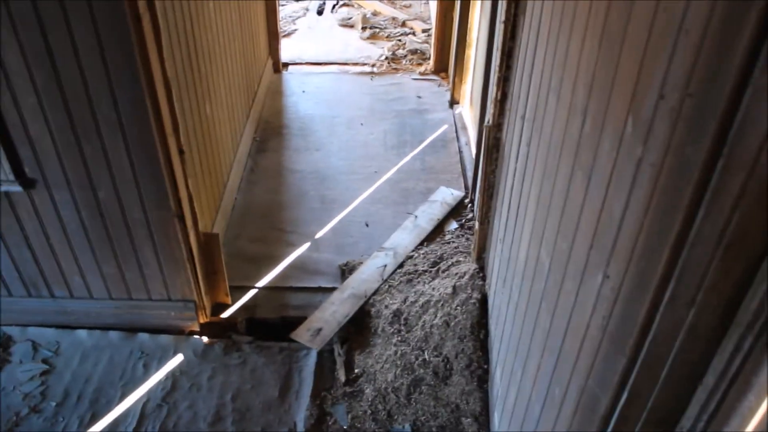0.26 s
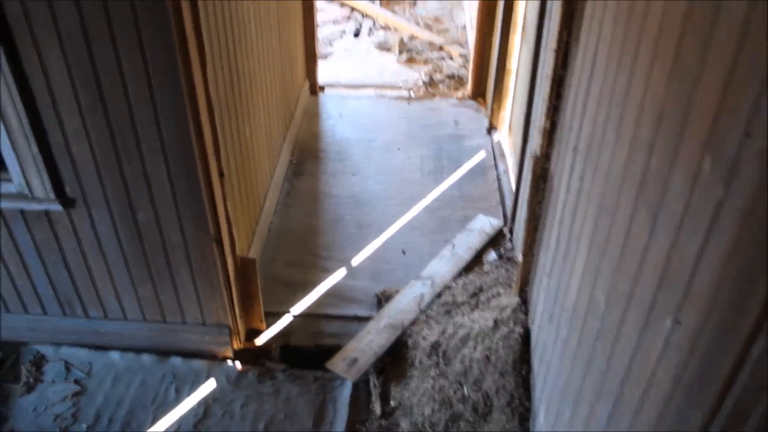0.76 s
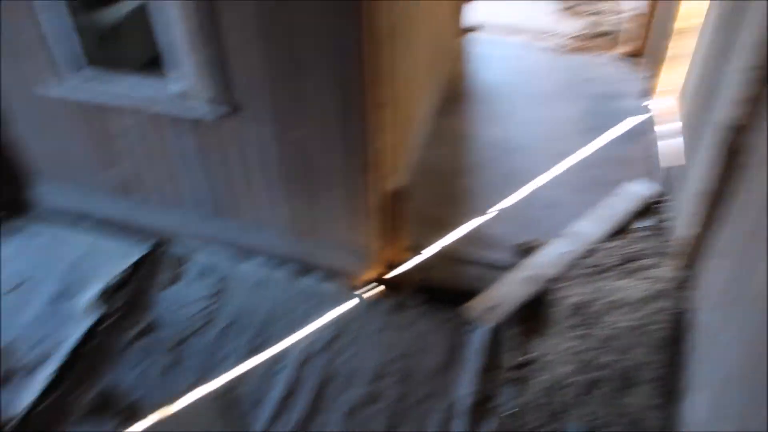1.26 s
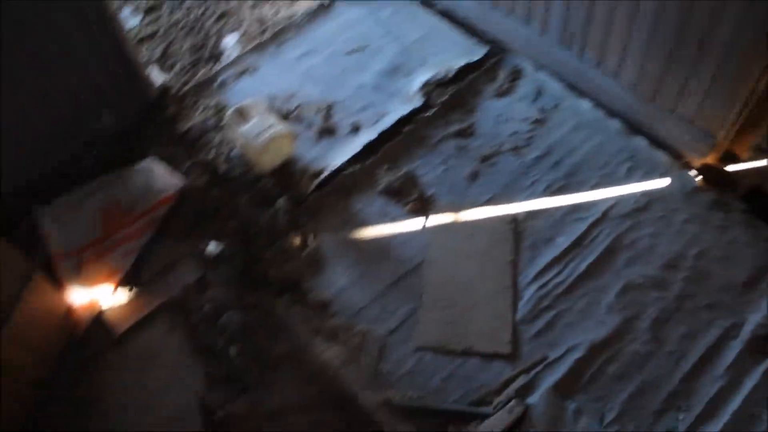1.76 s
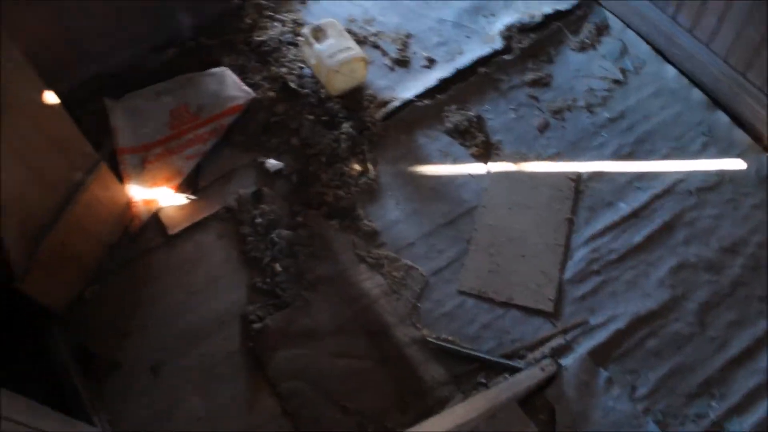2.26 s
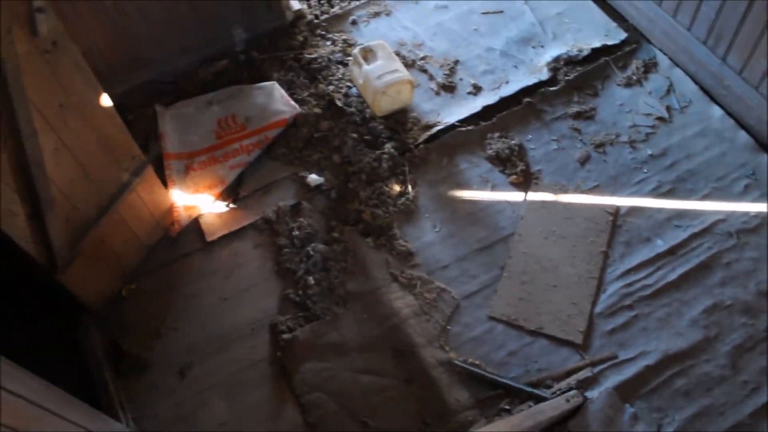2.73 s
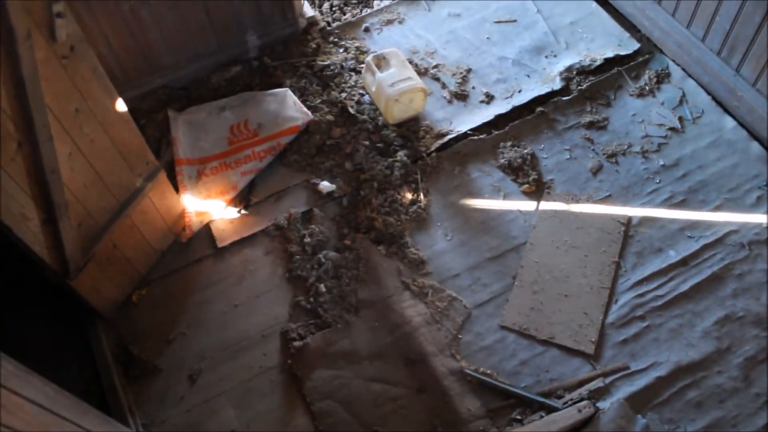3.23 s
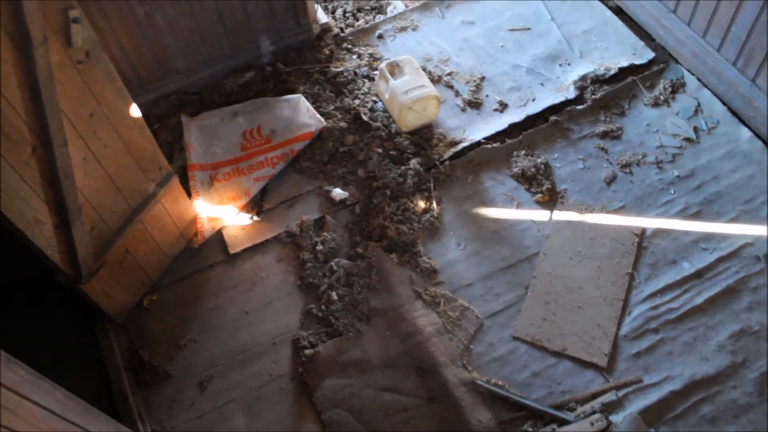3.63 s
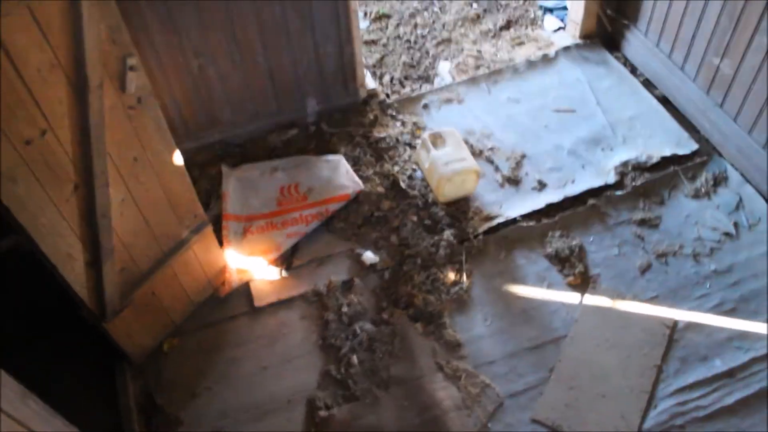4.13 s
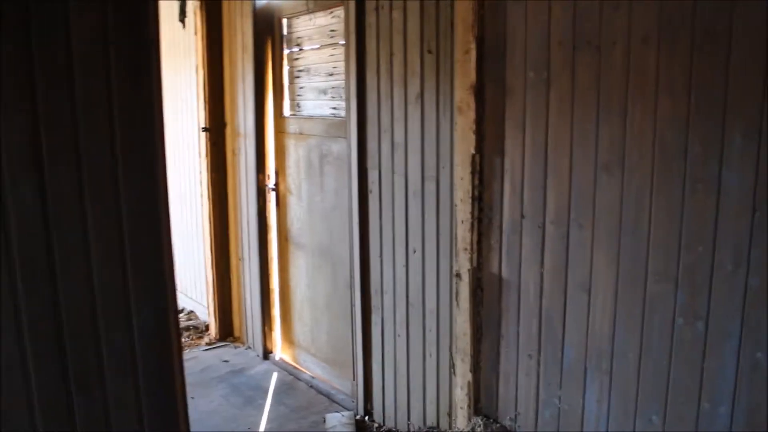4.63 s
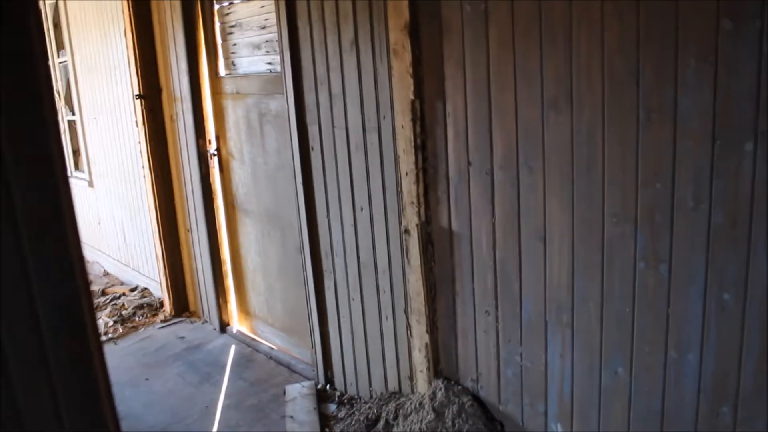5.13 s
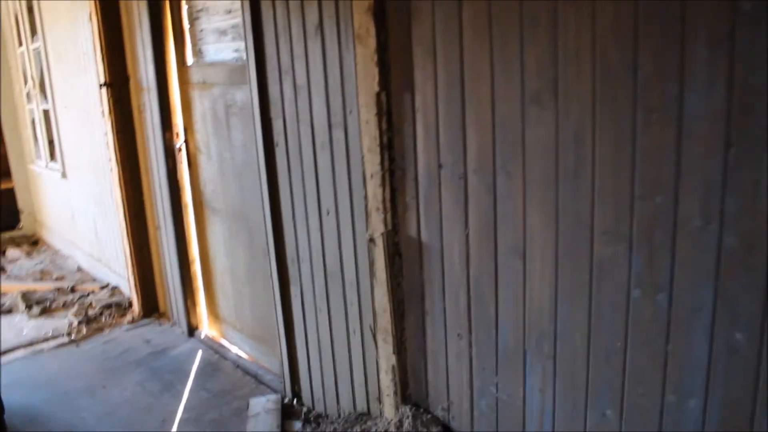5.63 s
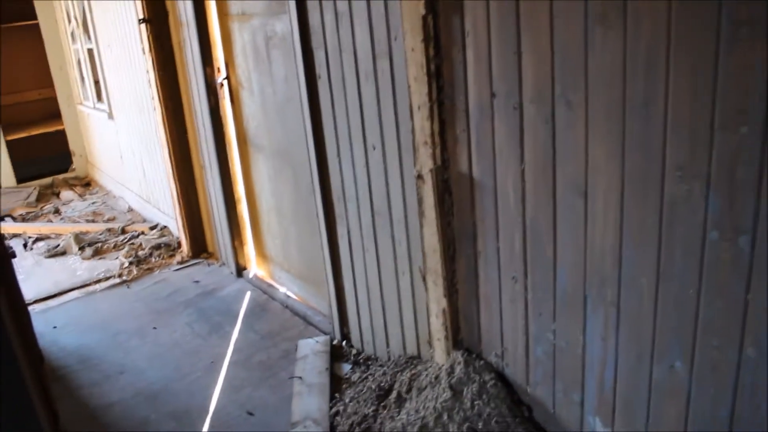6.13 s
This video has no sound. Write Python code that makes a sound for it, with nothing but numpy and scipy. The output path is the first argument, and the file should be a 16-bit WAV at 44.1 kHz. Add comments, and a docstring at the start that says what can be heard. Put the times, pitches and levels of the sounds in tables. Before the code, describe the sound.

Inside a bare abandoned wooden house, a handheld microphone catches low handling thumps and faint board knocks, then a gritty sole skid and pivot. A sharp brittle crack follows, then near stillness. Fingers tap and rub the camera body, the sound cuts out for an instant and returns weaker, with cloth rustle and a loud board clatter that rings briefly in the rooms.

```python
"""Soles shuffle through an empty wooden house: boards knock, grit scrapes and the bare rooms ring briefly.
Knocks are noise bursts through board resonances; scuffs, rubs and rustles are dense grains, coloured.
Brittle crumbs snap as short cracks. Close to the microphone a hand taps, bumps and rubs a camera body,
heard as clicks, damped low swings and stick-slip grains. Cloth and quiet air lie underneath.
The sound drops out once, briefly, and returns weaker."""
import sys
import numpy as np
from scipy import signal
from scipy.fft import rfft, irfft
from scipy.io import wavfile
from scipy.ndimage import uniform_filter1d

SR = 44100
rng = np.random.default_rng(int(sys.argv[2]) if len(sys.argv) > 2 else 0)


def generate_wav(signal):
    """Clip the signal to [-1, 1] and save it as 16-bit WAV at the path in sys.argv[1]."""
    frames = np.transpose(np.atleast_2d(signal))
    scaled = np.clip(frames, -1, 1) * 32767
    pcm = np.round(scaled).astype(np.int16)
    wavfile.write(sys.argv[1], SR, pcm)


N = 281799
TIME = np.arange(N) / SR
HIT = TIME[:SR // 3]  # time axis of one hit


def gain_of(db):
    """Decibels to amplitude."""
    return 10 ** (np.asarray(db) / 20)


def evened(x):
    """Scales to rms 1."""
    return x / np.sqrt(np.mean(x ** 2) + 1e-20)


def topped(x, size=176):
    """Scales a hit so that its loudest 4 ms have rms 1."""
    loudest_power = uniform_filter1d(x ** 2, size, mode="constant").max()
    return x / np.sqrt(loudest_power + 1e-20)


def read(points, hz):
    """Reads a curve of (Hz, value) points on a log-frequency axis."""
    f, value = np.transpose(points)
    return np.interp(np.log(hz + 1), np.log(f + 1), value)


def strokes(rows, rise_s, fall_s):
    """Gain of movements that rise, hold and fall, 20 dB per rise or fall time; the strongest one leads."""
    levels = []
    for s, hold, db in rows:
        before = (s - TIME) / rise_s
        after = (TIME - s - hold) / fall_s
        levels.append(db - 20 * np.maximum(before, after).clip(0, 10))
    return gain_of(np.max(levels, axis=0))


def add(mix, s, sound):
    """Mixes a sound in at a time in seconds."""
    part = mix[max(round(s * SR), 0):][:len(sound)]
    part += sound[:len(part)]


def colour(x, spectrum, lifts=(), size=8192):
    """Minimum-phase filter with a given spectrum and resonances of (Hz, width Hz, lift dB)."""
    hz = np.fft.rfftfreq(size, 1 / SR)
    db = np.maximum(read(spectrum, hz), -100)
    db = db + sum(lift / (1 + (2 * (hz - f) / width) ** 2) for f, width, lift in lifts)
    log_gain = np.log(gain_of(np.r_[db, db[-2:0:-1]]))
    response = np.exp(np.conj(signal.hilbert(log_gain)))
    impulse = np.fft.ifft(response).real[:size // 2]
    return signal.oaconvolve(x, impulse)[:len(x)]


def dying(t60):
    """Exponential decay by 60 dB in t60 seconds, over the length of a hit."""
    return np.exp(-np.log(1000) * HIT / max(t60, 1e-3))


def ring(modes, scale=1):
    """Damped modes that take about a millisecond to build up, slightly detuned at every blow."""
    tones = np.zeros(len(HIT))
    for hz, db, t60 in modes:
        pitch = hz * scale * (1 + 0.0049 * rng.standard_normal())
        tones += gain_of(db) * dying(t60) * np.sin(2 * np.pi * pitch * HIT)
    return tones * (1 - dying(0.005))


def drift(hz):
    """Random fluctuation of rms 1 that weakens steeply above a given rate."""
    rolloff = 1 + (np.fft.rfftfreq(N, 1 / SR) / hz) ** 4
    return evened(irfft(rfft(rng.standard_normal(N)) / rolloff, N))


def grains(per_s, spread_db, clump_db, clump_hz):
    """Tiny fractures of uneven size that come in stick-slip clumps."""
    size = gain_of(spread_db * np.minimum(rng.exponential(1, N), 4))
    sign = rng.choice([-1, 1], N)
    happens = rng.random(N) < per_s / SR
    return evened(size * sign * happens * gain_of(clump_db * drift(clump_hz)))


def wander(x, depth_db, size=(7, 12)):
    """The contact patch keeps changing, so resonances about 600 Hz wide come and go every 35 ms."""
    z = signal.stft(x, nperseg=512, noverlap=384)[2]
    patches = uniform_filter1d(rng.standard_normal(z.shape), size[0], 0)  # across frequency
    patches = uniform_filter1d(patches, size[1], 1)  # across time
    moved = signal.istft(z * gain_of(depth_db * evened(patches)), nperseg=512, noverlap=384)[1]
    return evened(moved[:len(x)])


# Spectrum of the air. Each row: frequency in Hz, density in dB per Hz.
AIR_COLOUR = [(12, -37), (20, 8), (133, -3), (185, 1), (393, -1.5), (534, -0.5), (705, -2), (767, -4.5),
              (985, -8), (1300, -10), (1670, -15), (3260, -15.5), (6910, -19.5), (11700, -29.5),
              (15500, -41)]
# Hollow resonances of the rooms. Each row: frequency in Hz, width in Hz, lift in dB.
AIR_MODES = [(269, 45, 1.5), (411, 39, 9), (576, 110, -1.5), (745, 40, 3.5)]
AIR_DB = -60


def air():
    """The quiet wash of outdoor air in the hollow rooms: resonant noise with a slowly drifting level."""
    wash = evened(colour(rng.standard_normal(N), AIR_COLOUR, AIR_MODES))
    return gain_of(AIR_DB) * wash * gain_of(0.58 * drift(0.93))


# The walker moves, clothes and litter stir. Each row: start in seconds, hold in seconds, level in dB.
MOVES = [(0, 0.36, -61), (1.05, 1, -53.5), (2.2, 0.27, -56), (3.85, 1, -56.5), (4.9, 1, -52),
         (5.75, 0.55, -54)]
MOVE_RISE_S, MOVE_FALL_S, STANDING_DB = 0.56, 0.37, -72


def stirring():
    """Gain of cloth and litter as the walker moves, with a faint floor at rest."""
    return np.hypot(strokes(MOVES, MOVE_RISE_S, MOVE_FALL_S), gain_of(STANDING_DB))


# Cloth swishes as a leg swings. Each row: start in seconds, hold in seconds, level in dB.
SWISHES = [(0, 0.013, -53), (.28, 0.091, -64.5), (1.088, .015, -48), (1.29, 0.28, -52.5),
           (2.05, 0.085, -59), (3.8, 0.035, -54), (4.58, 0.029, -53), (4.93, .02, -58), (5.47, .04, -42.5),
           (6.275, 0.0039, -50.5)]
SWISH_RISE_S, SWISH_FALL_S = 0.13, 0.14
# Spectrum of the leg swishes. Each row: frequency in Hz, density in dB per Hz.
SWISH_COLOUR = [(100, -17), (300, 0.5), (780, -5), (1400, -4), (3500, -5), (5600, -8), (8000, -6.5),
                (10000, -14), (12000, -24), (15000, -36.5)]
# Spectrum of the general rustle. Each row: frequency in Hz, density in dB per Hz.
RUSTLE_COLOUR = [(100, -15), (200, 1), (400, 0.5), (780, -5), (1400, -5.5), (3000, -9.5), (5600, -14),
                 (7200, -15.5), (9800, -18.5), (15000, -47.5)]
# A faint high rasp comes and goes. Each row: start in seconds, length in seconds, level in dB.
RASPS = [(4.396, 0.083, -55.5), (4.691, 0.048, -49.5), (5.405, 0.21, -50.5), (5.854, 0.095, -55.5),
         (5.92, 0.16, -49)]


def rustle(stir):
    """Fine crackle of cloth and litter, brighter where a leg swishes, with a narrow high rasp now and then."""
    fibres = wander(grains(per_s=5400, spread_db=2.5, clump_db=-0.1, clump_hz=40), depth_db=2.5)
    swish = strokes(SWISHES, SWISH_RISE_S, SWISH_FALL_S) * evened(colour(fibres, SWISH_COLOUR))
    swells = np.zeros(N)
    for s, length, db in RASPS:
        add(swells, s, gain_of(db) * np.hanning(int(length * SR)))
    rasp_colour = [(2000, -18), (6200, -10), (7100, 1.0), (8200, -12), (13000, -30)]
    rasp = colour(grains(per_s=4400, spread_db=-1, clump_db=2.5, clump_hz=60), rasp_colour)
    cloth = colour(grains(per_s=5000, spread_db=0.0, clump_db=0.4, clump_hz=40), RUSTLE_COLOUR)
    return stir * wander(cloth, depth_db=1.5) + swish + swells * evened(rasp)


def crumbs(stir):
    """Wherever cloth and litter stir, a few tiny separate ticks stand out."""
    tick_colour = [(800, -42.5), (3000, 4), (7000, -1.5), (10000, -7), (15000, -20)]
    ticks = colour(grains(per_s=110, spread_db=4.0, clump_db=2.8, clump_hz=6.2), tick_colour)
    return gain_of(-13) * stir * evened(ticks)


def bump(hz):
    """One heavily damped low swing of the camera body."""
    swell = hz * HIT / 0.38
    return swell * np.exp(1 - swell) * np.sin(2 * np.pi * hz * HIT)


# The grip shifts or a footfall jolts the arm. Each row: start in seconds, hold in seconds, level in dB.
JOLTS = [(.1, 0.12, -55.5), (.67, 0.13, -46), (.99, 0.13, -42), (1.28, 0.32, -46.5), (1.72, 0.17, -54),
         (2.31, 0.11, -51.5), (2.82, 0.13, -46.5), (3.04, 0.053, -48.5), (3.29, 0.023, -57),
         (3.68, 0.17, -47), (3.95, 0.27, -68), (5.16, 0.11, -50), (5.52, 0.044, -46)]
JOLT_RISE_S, JOLT_FALL_S, STEADY_HAND_DB = 0.075, 0.11, -73
SETTLE_DB, SETTLE_S = -15, 0.66  # a weaker, slower tremor surrounds every jolt
# Spectrum of the handling rumble. Each row: frequency in Hz, density in dB per Hz.
RUMBLE_COLOUR = [(8, -28), (20, 0.5), (43, 3), (90, -1), (135, -8), (220, -22), (400, -55)]
# The heaviest bumps of the hand. Each row: start in seconds, level in dB, pitch in Hz.
BUMPS = [(0.576, -46.5, 70), (0.661, -36, 83), (.783, -36, 70.4), (1.007, -32, 91), (1.027, -36, 97),
         (1.048, -32.5, 99), (1.175, -37, 65), (1.353, -35, 86), (1.422, -31, 59.5), (1.587, -34, 68),
         (2.3, -34.5, 89), (2.738, -44, 69), (2.849, -36.5, 119), (3.088, -37, 105), (3.746, -36.5, 95),
         (3.774, -33, 107), (5.258, -43, 131)]
SMALL_BUMPS_PER_S, SMALL_BUMP_HZ, SMALL_BUMP_DB = 68, 113.5, -8.5  # dB relative to the effort


def handling():
    """Each jolt of the hand brings a rumble and a scatter of low bumps, then settles."""
    tremor = gain_of(SETTLE_DB) * strokes(JOLTS, SETTLE_S / 2, SETTLE_S)
    jolts = strokes(JOLTS, JOLT_RISE_S, JOLT_FALL_S)
    effort = np.maximum(jolts, tremor) + gain_of(STEADY_HAND_DB)
    rumble = evened(colour(rng.standard_normal(N), RUMBLE_COLOUR))
    nudges = rng.choice([-1, 1], N) * (rng.random(N) < SMALL_BUMPS_PER_S / SR)
    small = evened(signal.oaconvolve(nudges, bump(SMALL_BUMP_HZ))[:N])
    out = effort * (gain_of(-4) * rumble + gain_of(SMALL_BUMP_DB) * small)
    for s, db, hz in BUMPS:
        add(out, s, gain_of(db) * bump(hz))
    return out


# The hand rubs the camera, firmly and then lightly.
# Each row: start in seconds, hold in seconds, level in dB, depth of the surges in dB.
RUBS = [(3.961, .148, -34.5, 2), (4.125, .11, -47, -0.5)]
RUB_RISE_S, RUB_FALL_S, SURGES_PER_S, PRESS_DB_PER_S = 0.038, 0.02, 22.6, 27
# Spectrum of skin on the camera body. Each row: frequency in Hz, density in dB per Hz.
RUB_COLOUR = [(88, -41), (150, -18.5), (373, 3.5), (420, -19), (561, -22.5), (781, -10), (948, -12.5),
              (1200, -8.5), (1570, -12), (3620, -11), (4480, -8.5), (5760, -10), (7560, -10), (10100, -18),
              (15500, -50)]


def rub():
    """Skin sticks and slips on the camera body in even surges, pressing harder through each stroke."""
    force = np.zeros(N)
    for s, hold, db, surge_db in RUBS:
        t = np.clip(TIME - s, 0, hold)
        press_db = PRESS_DB_PER_S * (t - hold / 2)
        sway_db = press_db + surge_db * np.cos(2 * np.pi * SURGES_PER_S * (TIME - s))
        force += strokes([(s, hold, db)], RUB_RISE_S, RUB_FALL_S) * gain_of(sway_db)
    slips = grains(per_s=6000, spread_db=2.2, clump_db=0.5, clump_hz=200)
    modes = [(320, 59, -9.5), (1260, 300, 1.5), (2420, 980, 2.0), (4530, 410, 3), (5730, 510, -8.0)]
    return force * wander(colour(slips, RUB_COLOUR, modes), depth_db=3.5)


# Fingers tap the camera body. Each row: start in seconds, ring level in dB, ring pitch in Hz,
# click level in dB, t60 of the click in seconds.
TAPS = [(.418, -47.5, 285, -62, 0.019), (.818, -31.5, 162, -64, .01), (.974, -36.5, 216, -66, 0.022),
        (2.245, -36.5, 222, -68, .01), (2.301, -34, 246, -43.5, .01), (3.634, -45, 263, -44, .03),
        (3.677, -40, 254, -43, 0.056), (3.804, -47, 302, -48, .04), (3.8217, -32.5, 313, -27.5, 0.015),
        (3.879, -35, 306, -42.5, 0.021), (3.931, -39, 333, -39, 0.02), (3.9773, -31.5, 324, -39, 0.011),
        (4.048, -34.5, 310, -43, 0.014)]
# Ring of the camera body. Each row: multiple of the pitch, level in dB, t60 in seconds.
CASE_MODES = [(.62, -15.5, 0.11), (1, 7, 0.027), (1.22, -16, 0.02)]
# Spectrum of the fingertip click. Each row: frequency in Hz, density in dB per Hz.
CLICK_COLOUR = [(240, -13.5), (400, -15), (700, -3.5), (1300, 0), (2150, -4), (3300, -7.5), (4900, -5.5),
                (6500, -11.5), (10000, -16.5), (14000, -47)]


def taps():
    """A dry click with the short hollow ring of the camera body, whose pitch follows the grip."""
    out = np.zeros(N)
    for s, ring_db, hz, click_db, t60 in TAPS:
        click = topped(colour(rng.standard_normal(len(HIT)) * dying(t60), CLICK_COLOUR))
        body = topped(ring(CASE_MODES, hz))
        add(out, s, gain_of(click_db) * click + gain_of(ring_db) * body)
    return out


# A crumb snaps close by. Each row: start in seconds, level in dB, centre in Hz, t60 in seconds.
SNAPS = [(2.0404, -34.5, 4200, 0.0059), (2.279, -58, 7500, .008), (2.3278, -39, 3520, .031),
         (2.3289, -25, 3200, 0.017), (2.468, -37, 5440, .0053), (3.530, -39.5, 6800, .0039),
         (3.847, -48, 6000, .023), (4.1085, -31.5, 2960, 0.014), (4.658, -34.5, 6600, 0.014),
         (5.979, -50, 4300, .0065), (6.068, -44.5, 4230, .0074)]
# Brittle tone shared by every snap. Each row: frequency in Hz, density in dB per Hz.
BRITTLE_COLOUR = [(300, 5), (2000, -2), (3200, -1.5), (8000, -2), (10500, -12.5), (13000, -20),
                  (15500, -27)]


def snaps():
    """A brittle crumb breaks: one sharp crack, then a few milliseconds of splinters."""
    out = np.zeros(N)
    for s, db, hz, t60 in SNAPS:
        crack = rng.standard_normal(len(HIT)) * dying(t60)
        crack[0] += 5  # the sharp first break
        shape = [(hz / 10, -25), (hz / 2, -17), (hz * 0.87, -2), (hz, 0), (hz * 1.38, -7), (hz * 3, -20)]
        add(out, s, gain_of(db) * topped(colour(colour(crack, shape), BRITTLE_COLOUR)))
    return out


# A sole skids on grit. Each row: start in seconds, hold in seconds, level in dB.
SKIDS = [(1.567, 0.034, -27), (1.66, 0.022, -39)]
SKID_RISE_S, SKID_FALL_S = 0.0025, 0.07
# Spectrum of the skid. Each row: frequency in Hz, density in dB per Hz.
SCRAPE_COLOUR = [(180, -9.5), (300, -6), (641, -13), (1000, -10.5), (1420, -11), (1590, -5.5), (1730, -15),
                 (2210, -4.5), (2520, -10), (3280, 1), (5570, 0), (8010, -1), (12300, -23.5), (15500, -38)]
# The sole pivots under the body's weight. Each row: start in seconds, hold in seconds, level in dB.
PIVOTS = [(1.76, 0.026, -46), (1.85, .015, -40.5), (1.886, 0.032, -36.5), (1.98, 0.034, -44.5)]
PIVOT_RISE_S, PIVOT_FALL_S = 0.063, 0.091
# Spectrum of the pivot. Each row: frequency in Hz, density in dB per Hz.
PIVOT_COLOUR = [(150, -34), (300, -25), (800, -20), (1300, -2), (1800, -8.5), (2800, -3), (4200, -5.5),
                (5600, -8.5), (8400, -6.5), (12000, -21), (15500, -39)]
# Resonances of the pivoting sole. Each row: frequency in Hz, width in Hz, lift in dB.
SOLE_MODES = [(3350, 440, 9.5), (4750, 890, 4.5), (6370, 330, 9.5), (8400, 650, 0.5)]


def scuffs():
    """The sole skids, then pivots; dense grains sound through its resonances."""
    skid_modes = [(3900, 230, 3.5), (6350, 260, 1.8), (8050, 350, 1)]
    skid_grains = grains(per_s=9000, spread_db=2, clump_db=0.5, clump_hz=168)
    skid = wander(colour(skid_grains, SCRAPE_COLOUR, skid_modes), depth_db=2.5)
    pivot_grains = grains(per_s=9300, spread_db=1.0, clump_db=1.0, clump_hz=120)
    pivot = wander(colour(pivot_grains, PIVOT_COLOUR, SOLE_MODES), depth_db=3.0)
    return (strokes(SKIDS, SKID_RISE_S, SKID_FALL_S) * skid
            + strokes(PIVOTS, PIVOT_RISE_S, PIVOT_FALL_S) * pivot)


# A shoe meets a loose board. Each row: start in seconds, wood level in dB, crushed grit level in dB,
# t60 of the blow in seconds, pitch of that board in Hz.
KNOCKS = [(.045, -44.5, -55.5, 0.19, 340), (.805, -47, -59.5, 0.21, 2670), (.883, -47.5, -77, 0.3, 395),
          (1.030, -39.5, -51, 0.15, 705), (1.050, -40.5, -42, 0.069, 1250), (1.311, -36.5, -65, 0.03, 1780),
          (1.324, -36, -64, 0.16, 397), (2.302, -39.5, -43, 0.082, 1390), (2.319, -36, -51, 0.095, 303),
          (2.323, -42.5, -35.5, 0.12, 2900), (2.344, -42, -35.5, 0.15, 324),
          (2.573, -55.5, -45.5, 0.076, 1550), (3.408, -52, -66, 0.027, 1700), (4.387, -46, -61, 0.074, 306),
          (4.42, -50, -66, 0.16, 192), (4.754, -45.5, -74.5, 0.08, 574), (5.161, -30.5, -51, 0.16, 880),
          (5.172, -39, -51, 0.49, 1460), (5.512, -22, -34, 0.09, 775), (5.52, -20, -27, 0.029, 1010),
          (5.522, -23, -27, .059, 1140), (5.531, -35.5, -35.5, 0.18, 1060),
          (6.076, -46.5, -46.5, 0.18, 3560), (6.204, -50, -51, 0.1, 1430)]
# Spectrum of board on floor. Each row: frequency in Hz, density in dB per Hz.
BOARD_COLOUR = [(25, -27), (90, -13), (160, 0.5), (250, -0.5), (380, 2.5), (490, -4.5), (620, -3),
                (900, -5), (1300, -6.5), (1900, -6.5), (2500, -8.5), (3300, -16), (5000, -15.5),
                (8000, -30.5), (14000, -41)]
# Ringing of the floor. Each row: frequency in Hz, level in dB, t60 in seconds.
FLOOR_MODES = [(158.7, 2.5, 0.19), (400, -19, 0.26), (580, 1, 0.26), (790, -6, 0.13), (900, -9, 0.085),
               (985, -2, 0.16), (1130, -4, 0.17), (1418, 0, 0.18)]
# Spectrum of crushed grit. Each row: frequency in Hz, density in dB per Hz.
GRIT_COLOUR = [(880, -44), (1500, -23), (1640, -3.5), (2000, -8.5), (2380, -22.5), (3030, -4.5),
               (3430, -8.5), (4120, -7.5), (4540, -11), (7210, -10), (8750, -10.5), (13800, -33.5),
               (15000, -40)]
# Brightness of the grit from step to step. Each row: time in seconds, treble edge in Hz.
GRIT_EDGE = [(1, 11400), (2.3, 14700), (5.2, 6800)]


def knocks():
    """A board clatters against the floor at its own pitch and sets it ringing, crushing the grit on it."""
    out = np.zeros(N)
    for s, wood_db, grit_db, t60, hz in KNOCKS:
        clatter, crush = rng.standard_normal((2, len(HIT))) * dying(t60)
        clatter[0] += 2  # first contact
        board = topped(colour(clatter, BOARD_COLOUR, [(hz, 30 + 0.47 * hz, 11)]))
        wood = board + gain_of(-18) * topped(ring(FLOOR_MODES))
        crush *= gain_of(2.8 * rng.standard_normal(len(HIT)))  # grains of uneven size
        edge_hz = min(np.interp(s, *np.transpose(GRIT_EDGE)), .45 * SR)
        crush = signal.lfilter(*signal.butter(2, edge_hz, fs=SR), crush)
        grit = topped(colour(crush, GRIT_COLOUR))
        add(out, s, gain_of(wood_db) * wood + gain_of(grit_db) * grit)
    return out


# Decay of the bare rooms. Each row: frequency in Hz, t60 in seconds.
ROOM_DECAY = [(100, 0.93), (400, .55), (1500, 0.47), (5000, 0.33), (12000, 0.1)]
# First returns from floor, ceiling and walls. Each entry: delay in seconds.
ECHO_S = (.013, .021, .029, .037)


def room(x):
    """A few early returns among dense reflections off bare panelling, each band dying at its own speed."""
    returns = rng.standard_normal(SR) * (rng.random(SR) < 4000 / SR) * (TIME[:SR] > .006)
    for s in ECHO_S:
        add(returns, s, np.array([rng.choice([-4., 4.])]))
    hz, t, z = signal.stft(returns, SR, nperseg=256)
    decay = np.exp(-np.log(1000) * t / read(ROOM_DECAY, hz)[:, None])
    tail = signal.istft(z * decay, SR, nperseg=256)[1]
    return signal.fftconvolve(x, tail / np.linalg.norm(tail))[:N]


def scene():
    """Feet excite the room most, close snaps, taps and rubs faintly; handling, cloth and air stay dry."""
    boards, soles, close = knocks(), scuffs(), snaps() + taps() + rub()
    stir = stirring()
    echo = room(gain_of(-10.0) * boards + gain_of(-14) * soles + gain_of(-19.5) * close)
    return (boards + soles + close + echo + handling() + rustle(stir) + crumbs(stir) + air())[None]


# Overall gain: steady, a brief dropout, then steady but weaker. Each row: time in seconds, gain in dB.
DROPOUT = [(4.259, 2.5), (4.263, -19.5), (4.28, -46), (4.32, -41), (4.328, -15), (4.345, -5)]
EDGE_HZ = 15700


def record(dry):
    """Rides the overall gain through the brief dropout, then cuts the treble above the band edge."""
    live = gain_of(np.interp(TIME, *np.transpose(DROPOUT)))
    lowpass = signal.firwin(511, EDGE_HZ, window=("kaiser", 9), fs=SR)
    return signal.oaconvolve(dry * live, lowpass[None], "same")


dry = scene()
out = record(dry)
generate_wav(out)
```